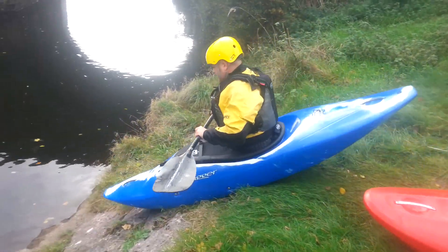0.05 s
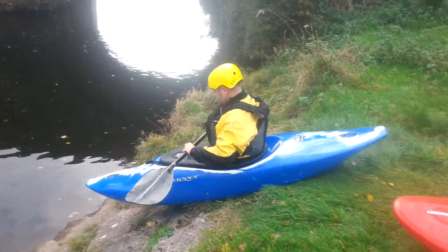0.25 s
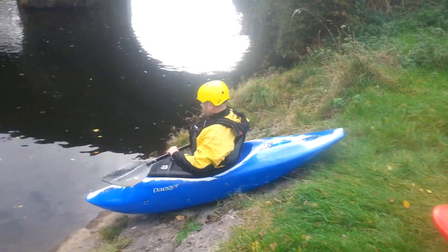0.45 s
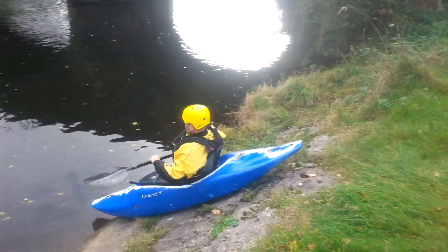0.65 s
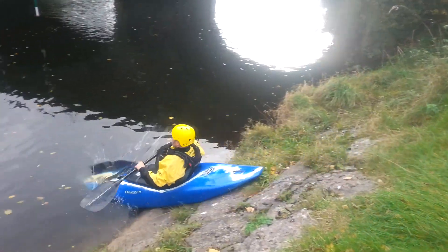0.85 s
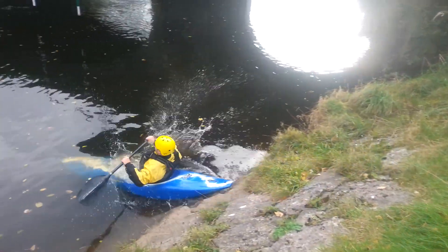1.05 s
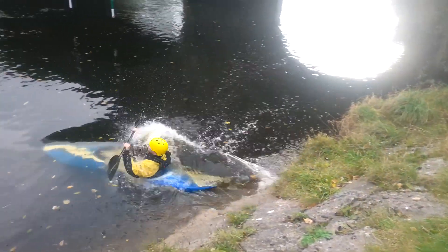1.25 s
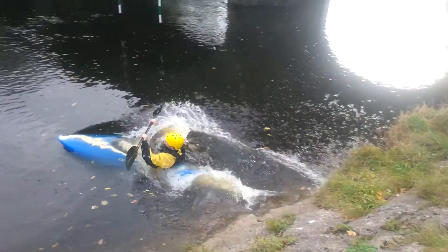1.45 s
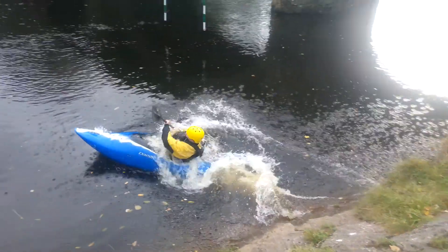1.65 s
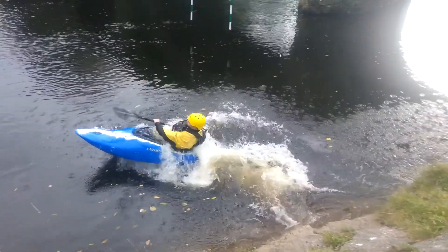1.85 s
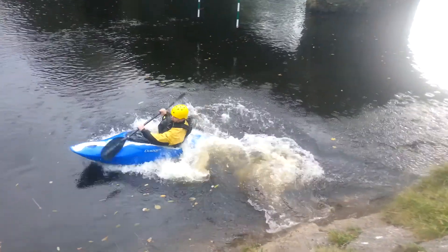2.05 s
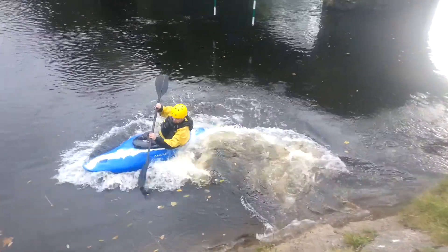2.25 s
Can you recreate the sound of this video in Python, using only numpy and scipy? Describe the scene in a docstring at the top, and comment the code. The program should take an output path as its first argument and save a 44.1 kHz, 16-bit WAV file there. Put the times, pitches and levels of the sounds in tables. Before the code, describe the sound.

Hollow knocks and grinding of a kayak sliding down rock into churning river water.

```python
"""A riverbank of grass and bare rock, heard from close by on a small two-port microphone.
A plastic kayak slides down the grass, bangs and grinds over the rock and plunges into the river.
The hollow hull booms at each blow; then water slaps and gulps around it over the rush and churn
of the current. The microphone hisses faintly, ducks at the loud blows and overloads on the hardest."""
import sys
import numpy as np
from scipy import signal
from scipy.fft import rfft, irfft
from scipy.io import wavfile
from scipy.ndimage import uniform_filter1d

SR = 44100
rng = np.random.default_rng(int(sys.argv[2]) if len(sys.argv) > 2 else 0)


def log_audio(samples):
    """Write samples as a 16-bit WAV file to the path given in sys.argv[1]."""
    # one column per channel
    frames = np.atleast_2d(samples).T
    # limit to full scale, then quantise
    limited = np.clip(frames, -1, 1)
    pcm = np.round(limited * 32767).astype(np.int16)
    wavfile.write(sys.argv[1], SR, pcm)


N = 105840
TIME, FREQ = np.arange(N) / SR, np.fft.rfftfreq(N, 1 / SR)

# Spectra of current, churn, grinding hull, grit, slaps and hiss: (frequency [Hz], relative level [dB])
RIVER_SPECTRUM = [(25, -39), (100, -16), (265, 3.5), (450, -1), (800, -1), (1020, -7.5), (1300, -9.5),
                  (1900, -7), (2500, -43.5), (3000, -30.5), (4700, -47), (6500, -60)]
CHURN_SPECTRUM = [(110, -30), (280, 3), (450, -5.5), (650, 4), (910, 5), (1300, -7), (1900, -7.5),
                  (2500, -10.5), (3500, -21.5), (4700, -30.5), (14000, -71.5)]
GRIND_SPECTRUM = [(60, -22), (150, -5), (320, -9.5), (480, 4.5), (680, -1), (1000, -0.5), (1350, -4.5),
                  (3000, -59)]
GRIT_SPECTRUM = [(600, -11), (1200, -17.5), (1600, 7.5), (1900, 6.5), (2150, -2), (2500, 3.5), (2900, -10),
                 (3300, -0.5), (4000, -19), (4900, -23), (14000, -70)]
SLAP_SPECTRUM = [(60, -18), (170, 1), (600, 5.5), (1000, -2.5), (1700, -7), (2400, -4), (2900, -23),
                 (3350, -14), (7000, -60)]
HISS_SPECTRUM = [(6200, -11.5), (8200, -1.5)]
# Churning of the water: (time [s], level [dB])
CHURN_LEVEL = [(.75, -31.5), (.95, -25.5), (1.1, -30), (1.35, -30.5), (1.93, -25.5), (2.4, -31.5)]
# The hull dragging over the bank: (time [s], grinding level [dB], grit level [dB])
DRAG_LEVELS = [(0, -40.5, -61), (.325, -36, -48), (.53, -51, -64.5), (.583, -18, -31), (.615, -35, -36.5),
               (.635, -9, -24), (.668, -30, -35.5), (.695, -20.5, -30.5), (.73, -30.5, -36.5),
               (.79, -21.5, -24.5), (.824, -23, -32.5), (.838, -20, -26.5), (.9, -20.5, -21.5),
               (.932, -26, -45), (.958, -27.5, -30), (1.015, -28, -81), (1.07, -42, -46)]
# Modes of the hollow hull: (frequency [Hz], relative level [dB], time to fall 60 dB [s])
HULL_MODES = [(110, 14.5, 0.19), (322, 13, 0.074), (572, 13.5, 0.074), (1620, 16, 0.038), (1860, 19, .07),
              (2390, 4, 0.051)]
# Soft thuds of the hull on turf and water: (time [s], peak force [dB], pitch [Hz])
SOFT_THUDS = [(0.021, -23.5, 228), (0.209, -21.5, 277), (1.095, -28.5, 137), (1.214, -19, 278),
              (1.266, -22.5, 300), (1.319, -25, 344), (1.423, -21, 547), (1.778, -21.5, 331),
              (1.848, -23, 230), (1.988, -23.5, 289)]
# Blows of the hull on rock: (time [s], peak force [dB], pitch [Hz], swell time [s])
ROCK_KNOCKS = [(0.5394, -4.5, 557, 0.0011), (.5435, -9.5, 663, 0.0013), (0.5531, -10, 251, 0.0029),
               (0.5654, -14, 605, 0.0019), (.593, -13.5, 553, 0.0015), (0.6265, -2, 388, 0.0021),
               (.629, -0.5, 803, 0.0015), (0.634, -1, 498, 0.0013), (.640, -6, 745, 0.001),
               (0.6521, -6.5, 278, 0.0017), (.689, -15, 958, .0026), (.7555, -11.5, 750, 0.0016),
               (0.7732, -5.5, 887, 0.001), (.788, -5, 1033, 0.00083), (0.8032, -6, 278, 0.0017),
               (.805, -10, 640, 0.0015), (0.8337, -10.5, 910, 0.001), (.888, -14, 520, .0017),
               (.9015, -10, 657, 0.0031), (0.964, -15.5, 266, 0.0033)]
# Chips of stone snapping under the hull: (time [s], peak force [dB], pitch [Hz])
STONE_CHIPS = [(0.541, -24.5, 2310), (0.581, -23.5, 2460), (0.629, -23.5, 2870), (.727, -21, 2360),
               (.748, -22, 2580), (.796, -22, 2320), (.805, -26.5, 3990), (0.899, -16, 2500),
               (0.946, -15.5, 2400)]
# Water slapping the boat: (time [s], length [s], level [dB])
WATER_SLAPS = [(1.161, 0.015, -21), (1.366, 0.08, -22.5)]
# How sound from the bank and from the river reaches the two ports:
# (frequency [Hz], left phase lead [rad], left minus right [dB], likeness [0-1])
BANK_AT_MIC = [(140, .1, .5, 1), (320, -.7, -1, .97), (560, -.35, -8, .98), (1000, 0, -3, .95),
               (1500, -1.2, 5, .8), (2050, -4.2, 5, .88), (2450, -5.9, -1, .88), (3300, -8.6, 1, .8),
               (5000, -12, -4, .5)]
RIVER_AT_MIC = [(120, .1, .5, 1), (270, -.45, 0, .98), (450, -.85, -5, .87), (650, -.1, -5, .95),
                (1000, .2, -3, .9), (1300, -.9, 2, .3), (1850, -3.5, 6, .75), (3000, -9.6, 0, .6),
                (4600, -18.4, -5, .3)]
# The microphone's own hiss: (time [s], level [dB])
MIC_HISS_LEVEL = [(.5, -55.5), (.78, -58.5), (1.1, -56), (1.8, -59)]


def amp(db):
    """Decibels to gain."""
    return 10 ** (np.asarray(db) / 20)


def unit(x):
    """Scales to rms 1."""
    return x / np.sqrt(np.mean(x ** 2) + 1e-20)


def by_hz(table, column=1):
    """One column of a table, read over log frequency."""
    rows = np.array(table)
    return np.interp(np.log(FREQ + 1), np.log(rows[:, 0] + 1), rows[:, column])


def by_time(table, column=1):
    """One column of a table, read over time; the end values hold."""
    rows = np.array(table)
    return np.interp(TIME, rows[:, 0], rows[:, column])


def colour(x, spectrum):
    """Gives x a spectrum, at rms 1."""
    return unit(irfft(rfft(x) * amp(by_hz(spectrum)), N))


def lowpass(x, hz):
    """Rolls x off above hz."""
    return irfft(rfft(x) / (1 + (FREQ / hz) ** 4), N)


def wander(rate_hz):
    """Slow random drift of rms 1."""
    return unit(lowpass(rng.standard_normal(N), rate_hz))


def clicks(per_s, spread_db):
    """Two trains of random clicks of uneven size."""
    size = amp(spread_db * np.minimum(rng.exponential(1, (2, N)), 4))
    return unit(size * rng.choice([-1, 1], (2, N)) * (rng.random((2, N)) < per_s / SR))


def ports(pair, place, mono_below_hz=328):
    """Mixes two versions of a sound onto the microphone ports, which hear the bass alike."""
    first, second = rfft(pair)
    lead, balance = by_hz(place, column=1), amp(by_hz(place, column=2))
    likeness = 1 - (1 - by_hz(place, column=3)) / (1 + (mono_below_hz / (FREQ + 1)) ** 4)
    left = first * balance * np.exp(1j * lead)
    right = likeness * first + np.sqrt(1 - likeness ** 2) * second
    return irfft(np.array([left, right]) * np.sqrt(2 / (1 + balance ** 2)), N)


def river(level_db=-31, surge_db=1.75):
    """The steady rush of the current, gently surging."""
    rush = colour(clicks(per_s=7600, spread_db=2.5), RIVER_SPECTRUM)
    return rush * amp(level_db + surge_db * wander(rate_hz=7.3))


def bubbles(per_size_per_s, spread_db, decay_cycles, glide):
    """Bubbles of many sizes, each a short ring that rises in pitch."""
    t, out = TIME[:SR // 12], np.zeros((2, N))
    for hz in np.geomspace(250, 5000, 28):
        age = t * hz / decay_cycles
        ring = np.exp(-age) * np.sin(2 * np.pi * hz * t * (1 + glide * age))
        draws = rng.random((600, 4))
        chance = 2 * per_size_per_s * N / SR / len(draws)  # each of the two sides has this rate
        side, when, strength, _ = draws[draws[:, -1] < chance].T
        level_db = -spread_db * np.log(np.maximum(strength, .02))
        births = np.zeros((2, N))
        births[(side * 2).astype(int), (when * N).astype(int)] = amp(level_db)
        out += np.sqrt(hz) * unit(signal.oaconvolve(births, ring[None], axes=1)[:, :N])
    return unit(out)


def churn():
    """Spray and bubbles churn throughout, swelling twice around the boat."""
    spray = clicks(per_s=5000, spread_db=2.0)
    foam = amp(-4) * bubbles(per_size_per_s=120, spread_db=1.5, decay_cycles=6.5, glide=0.026)
    return colour(spray + foam, CHURN_SPECTRUM) * amp(by_time(CHURN_LEVEL))


def scrape():
    """The hull sticks and slips on the bank, crushing grit under it in quick surges."""
    grind = colour(clicks(per_s=1500, spread_db=2.5), GRIND_SPECTRUM)
    surges = amp(1.54 * wander(rate_hz=39))
    grit = colour(clicks(per_s=1800, spread_db=3.5) * surges, GRIT_SPECTRUM)
    return grind * amp(by_time(DRAG_LEVELS, column=1)) + grit * amp(by_time(DRAG_LEVELS, column=2))


def hull(force, ring_db=-16.5, bank_db=-7, bank_t60_s=0.12, bank_delay_s=0.006, low_cut_hz=96):
    """The shell passes a force on and rings, the bank scatters the sound; little deep bass radiates."""
    t, ring = TIME[:SR // 3], 0
    for hz, db, t60 in HULL_MODES:
        unity_gain = 2 * np.log(1000) / (t60 * SR)  # at the resonance
        ring += unity_gain * amp(db - 60 * t / t60) * np.cos(2 * np.pi * hz * t)
    scatter = rng.standard_normal((2, len(t))) * amp(-60 * t / bank_t60_s) * (t > bank_delay_s)
    response = amp(ring_db) * ring + amp(bank_db) * scatter / np.linalg.norm(scatter[0])
    boom = force + signal.fftconvolve(force, response, axes=1)[:, :N]
    return signal.sosfilt(signal.butter(2, low_cut_hz, "highpass", fs=SR, output="sos"), boom)


def flex(start, db, hz, swell_s):
    """A flexing of the plastic that swells and dies within a few cycles."""
    age = np.clip(TIME - start, 0, 20 * swell_s)
    return amp(db) * age / swell_s * np.exp(1 - age / swell_s) * np.sin(2 * np.pi * hz * age)


def blows():
    """Soft thuds on turf and water, hard knocks and snapping chips on rock."""
    thuds = sum(flex(*row, swell_s=0.0037) for row in SOFT_THUDS)
    knocks = sum(flex(*row) for row in ROCK_KNOCKS)
    chips = sum(flex(*row, swell_s=0.0009) for row in STONE_CHIPS)
    return thuds + knocks + chips


def slap(start, length, db, spray_fall_db_per_s=293):
    """Water slaps shut against the boat: the bright spray dies quickly, the hollow gulp lasts."""
    age = np.clip(TIME - start, 0, length)
    water = colour(clicks(per_s=3000, spread_db=2.0), SLAP_SPECTRUM)
    gulp = lowpass(water, hz=1790)
    spray = (water - gulp) * amp(spray_fall_db_per_s * (length / 2 - age))
    envelope = np.sqrt(abs(np.sin(np.pi * age / length)))
    return amp(db) * envelope * (gulp + spray)


def scene():
    """At the microphone: the boat and its slaps from the bank, rush and churn from the river."""
    boat = hull(scrape() + blows())
    water = river() + churn()
    slaps = sum(slap(*row) for row in WATER_SLAPS)
    return ports(boat + slaps, BANK_AT_MIC) + ports(water, RIVER_AT_MIC)


def record(dry, threshold_db=-8.5, duck_slope=0.39, recover_db_per_s=44, cutoff_hz=14700):
    """The microphone hisses, ducks at loud blows, clips at full scale and loses the top treble."""
    hiss_db = by_time(MIC_HISS_LEVEL) + np.array([[-2.25], [2.25]])  # louder on the right
    hiss = colour(rng.standard_normal((2, N)), HISS_SPECTRUM) * amp(hiss_db)
    power = uniform_filter1d((dry ** 2).mean(0), size=400, origin=199)  # over the last 9 ms
    power_db = 10 * np.log10(abs(power) + 1e-12)
    fall_db = TIME * recover_db_per_s
    held_db = np.maximum.accumulate(power_db + fall_db) - fall_db  # jumps to a peak, then sinks steadily
    over_db = np.maximum(held_db - threshold_db, 0)
    ducked = (dry + hiss) * amp(-duck_slope * uniform_filter1d(over_db, size=200))
    band_limit = signal.firwin(511, cutoff_hz, window=("kaiser", 9), fs=SR)
    return signal.oaconvolve(np.clip(ducked, -1, 1), band_limit[None], "same")


dry = scene()
out = record(dry)
log_audio(out)
```